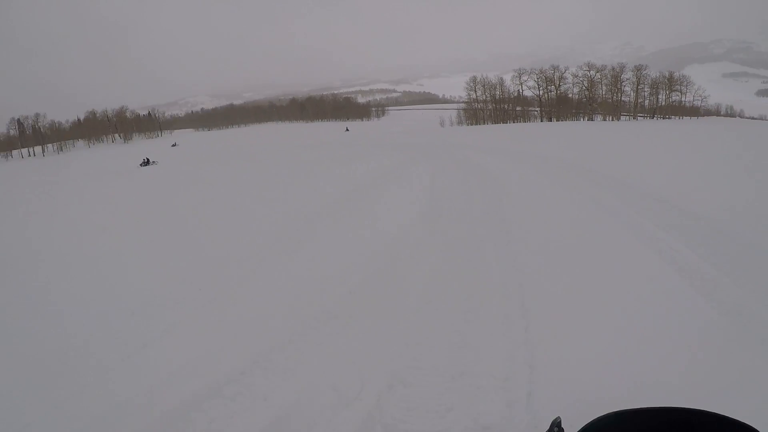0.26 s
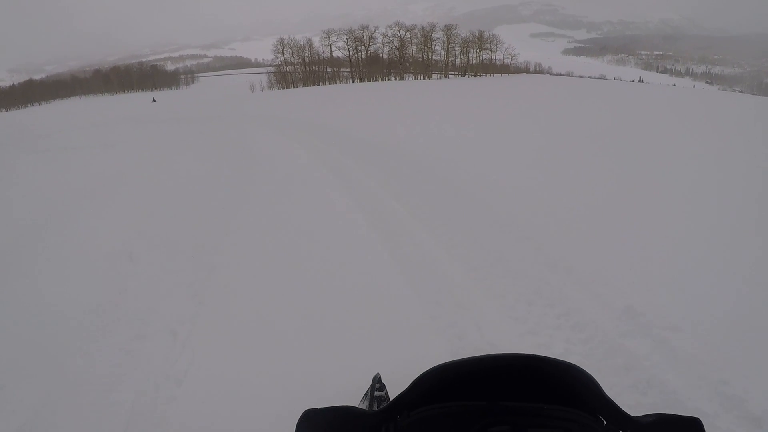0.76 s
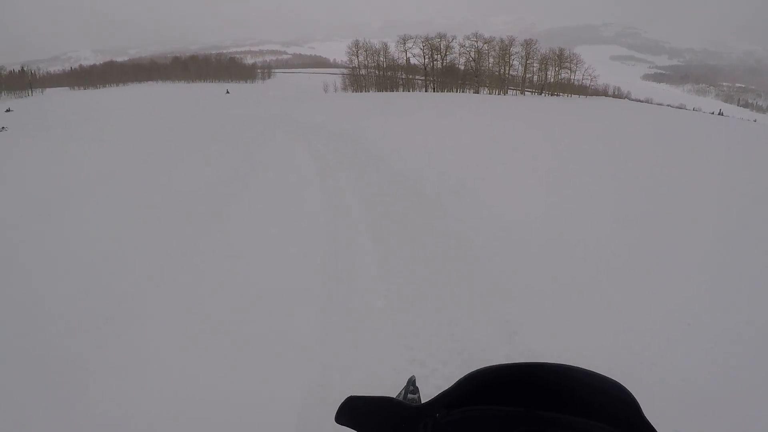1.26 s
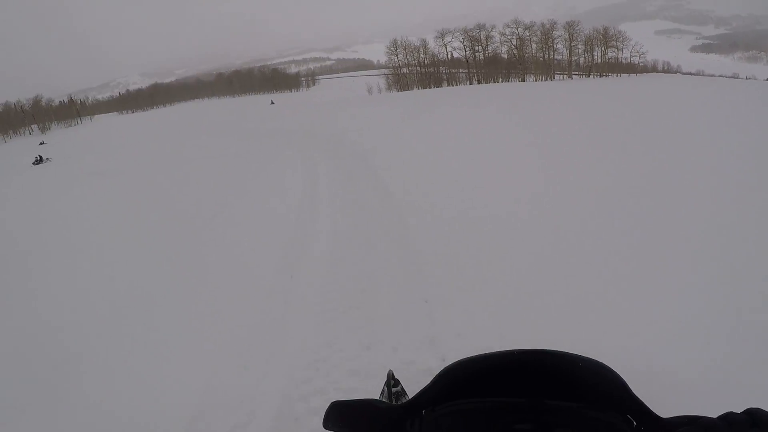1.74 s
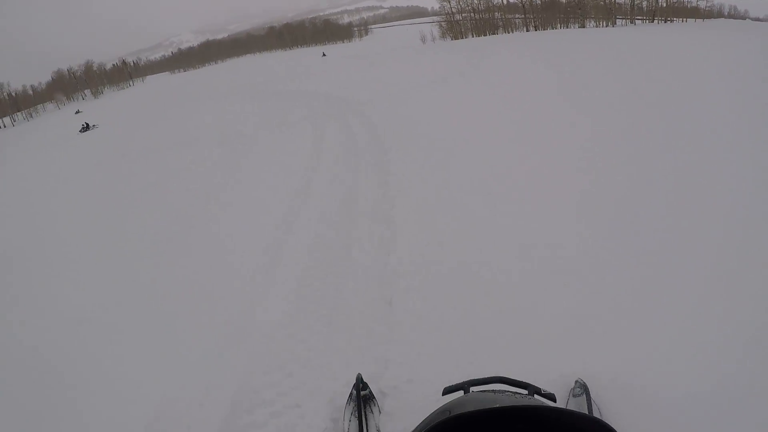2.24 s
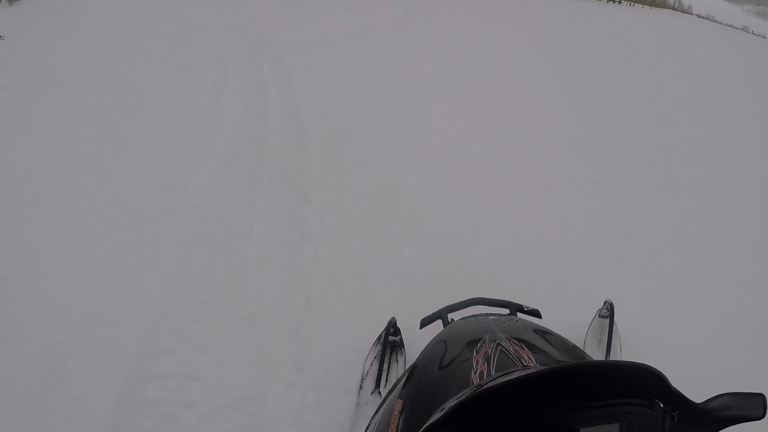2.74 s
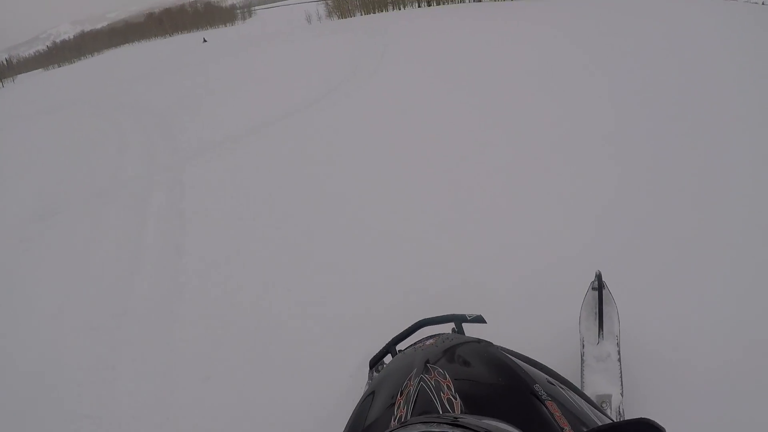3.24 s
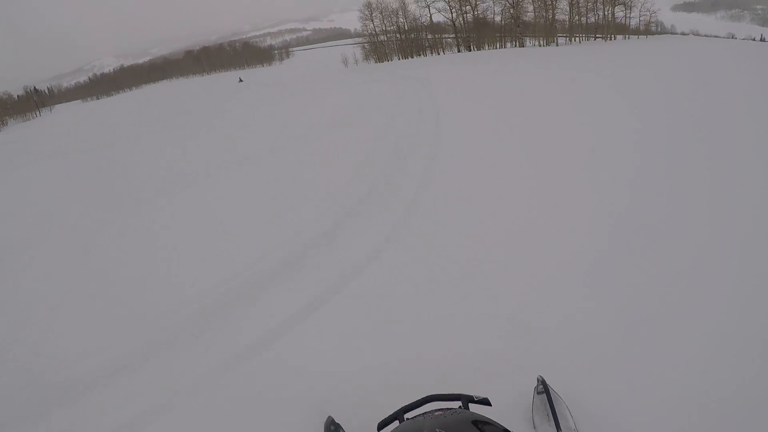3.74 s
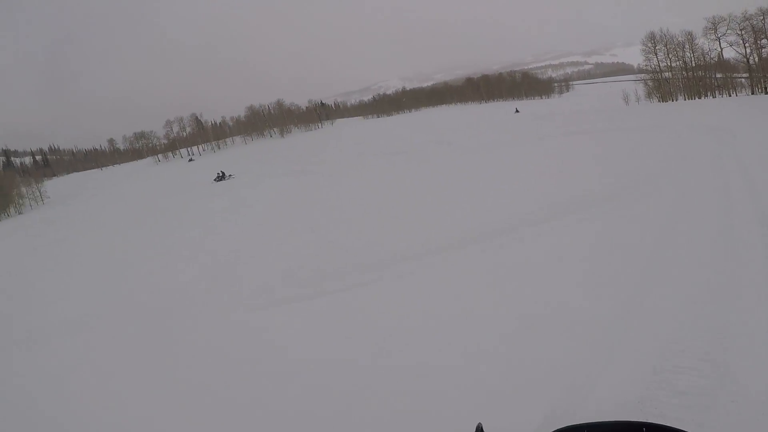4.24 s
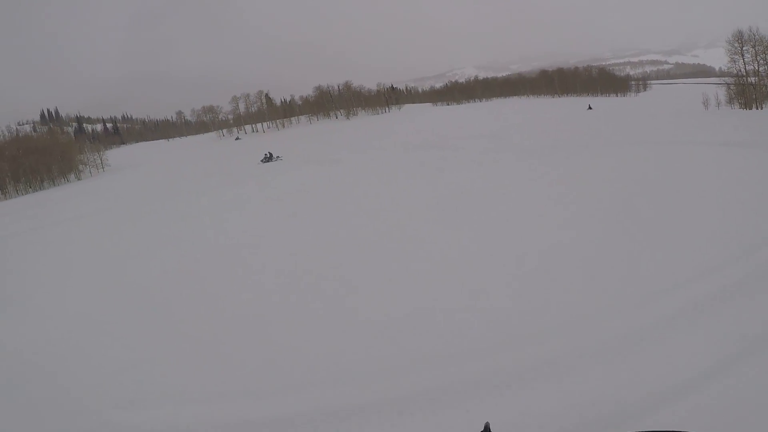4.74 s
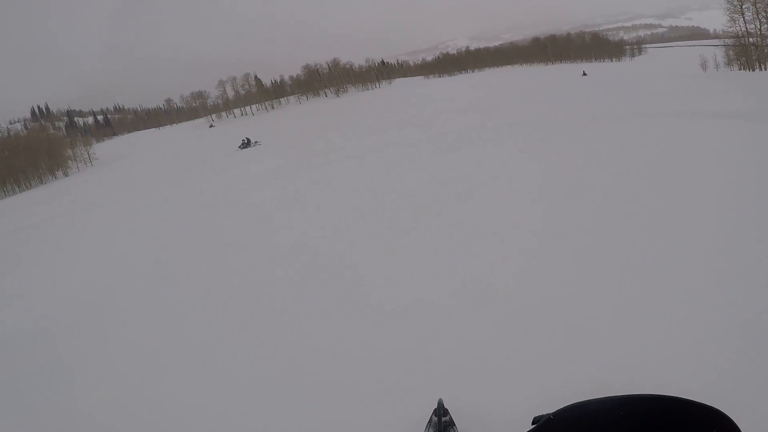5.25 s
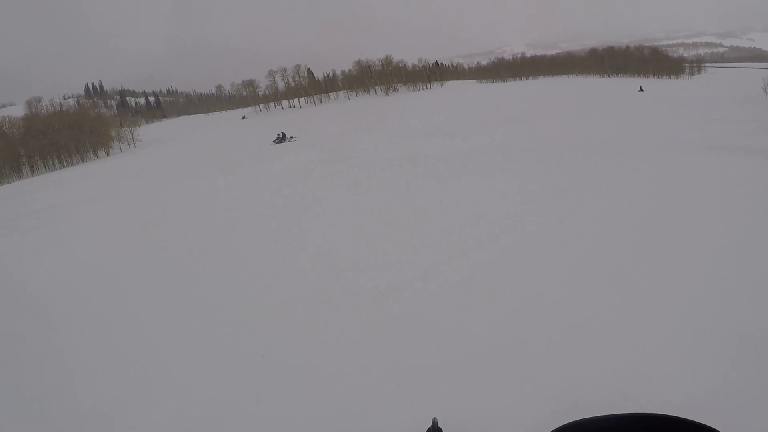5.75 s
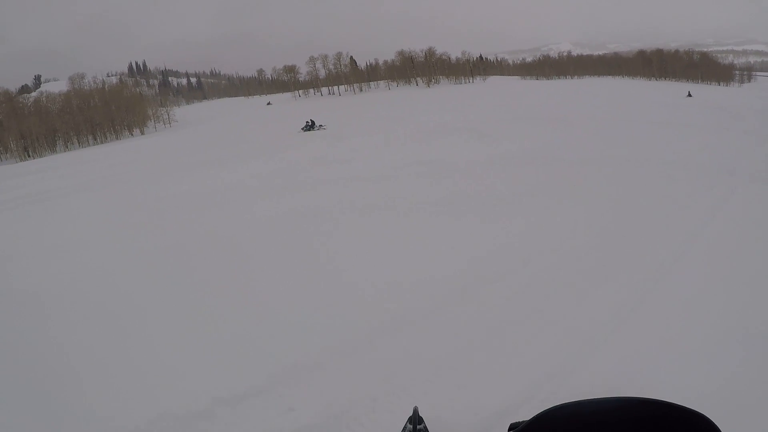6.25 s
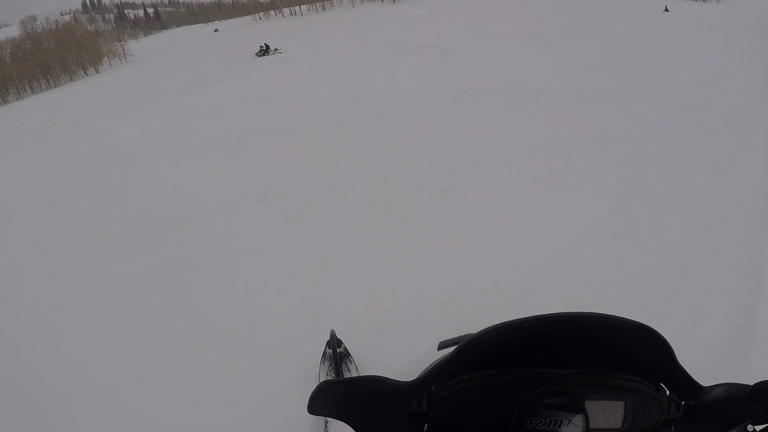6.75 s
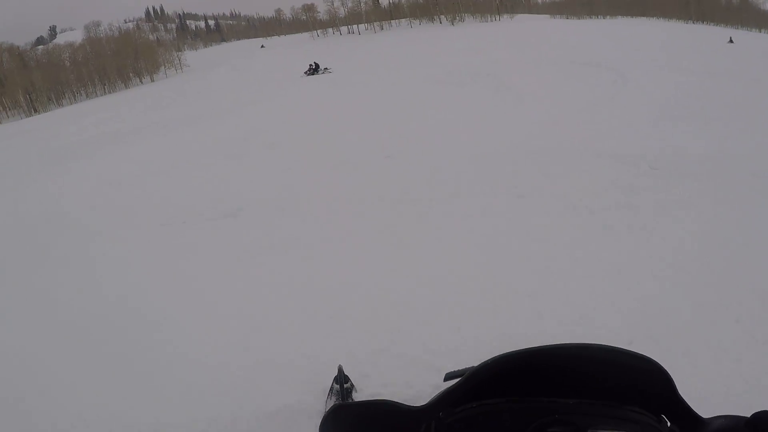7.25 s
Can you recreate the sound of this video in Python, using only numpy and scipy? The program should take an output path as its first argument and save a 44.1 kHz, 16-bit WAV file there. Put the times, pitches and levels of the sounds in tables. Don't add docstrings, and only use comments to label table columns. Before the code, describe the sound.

Outdoors on an open snowfield, helmet microphones sit close to a two-stroke snowmobile. From 0 to 2.2 seconds it cruises with a lumpy, stumbling drone, easing slightly lower, with hood buzz, gassy hiss and low wind rumble in wide stereo. At about 2.3 the throttle opens; the pitch climbs quickly to a hard, raspy, metallic howl by 3.1, while track lugs drum upward from 2.6. The howl holds until about 3.5, then drops steeply as the throttle shuts and the track tone vanishes. A wind gust buffets mainly the left at 3.4 to 3.9. Around 4 the engine coasts, softer and duller, and the image folds toward mono. From 4.5 it gradually regains strength, settling into an uneven, sputtering cruise with stronger wind rumble near 5.3 and faint snow hiss, still running when it stops around 7.5.

```python
import sys
import numpy as np
from scipy import signal
from scipy.fft import rfft, irfft, next_fast_len
from scipy.io import wavfile
from scipy.ndimage import uniform_filter1d

SR = 44100
rng = np.random.default_rng(int(sys.argv[2]) if len(sys.argv) > 2 else 0)


def natural_amplitude(level_db):
    exponent = np.asarray(level_db, float) / 20
    return 10 ** exponent


def waveform_to_disk(signal):
    frames = np.transpose(np.atleast_2d(signal))
    scaled = np.clip(frames, -1, 1) * 32767
    samples = np.round(scaled).astype(np.int16)
    wavfile.write(sys.argv[1], SR, samples)


N = 330750
T = np.arange(N) / SR
HOP = 256

# time_s, side_gain_db
WIDTH = [
    (0, -1),
    (3.75, 0),
    (4, -10.5),
    (4.3, -20.5),
    (4.6, -28),
    (4.8, -33),
    (4.9, -98.5),
    (7.5, -90.5),
]


def engine():
    ride = riding()
    return (exhaust_orders(ride) + stumble(ride) + muffler_rasp(ride) + block_ring(ride)
            + hood_buzz(ride) + gas_hiss(ride))


def riding():
    # time_s, firings_per_s
    firing_rate = [(0, 155), (.2, 154.6), (.5, 144.3), (.85, 136.9), (1.45, 132.7), (2.24, 130.3),
                   (2.33, 140), (2.5, 180.5), (2.94, 253.5), (3.03, 261.1), (3.12, 265.6), (3.52, 259.6),
                   (3.76, 184), (4.01, 156.4), (4.7, 148.8), (5.65, 148), (6.06, 156), (6.6, 153.1)]
    # time_s, intake_effort_db, even_burns_db, uneven_burns_db, firings_per_weak_burn,
    # steadiness_0_to_1
    running = [(0, -37.5, -11.5, -18, 3.07, 0.54), (.3, -35.5, -15.5, -12.5, 3.26, 0.44),
               (.65, -34, -17.5, -14, 4.3, 0.19), (1.2, -36, -17, -13, 4.3, 0.05),
               (1.5, -38, -20.5, -15, 3.4, 1), (2.23, -37.5, -19, -12, 4.04, .8),
               (2.36, -35, -6.5, -24.5, 3, 0.47), (2.7, -28.5, -8.5, -25, 3.7, .3),
               (3.07, -27, -10.5, -27.5, 3.5, 0.28), (3.25, -28, -12.5, -31, 3.8, .5),
               (3.5, -30.5, -14, -23.5, 4.1, 0.6), (3.6, -38, -27.5, -23.5, 2.95, 0.46),
               (3.87, -49, -46, -27.5, 3.2, 0.08), (4.3, -44, -31, -20, 3.5, 0),
               (4.7, -40.5, -22, -14.5, 3.61, 0), (5.5, -38.5, -14.5, -12, 2.68, .2),
               (6.02, -38, -10, -13.5, 3, 0.5), (7.5, -38, -11.5, -15, 3.28, 0.25)]
    open_s, opening_s, shut_s, shutting_s = 2.28, .3, 3.5, 0.0919
    cruise_hz, full_hz = 140, 266
    cruise_db, knee_db = -12.5, -41.5
    loose_hz, locked_hz, wide_open_hz = 25.08, 4.32, 35.14

    hz, = curves(firing_rate)
    effort_db, even_db, uneven_db, spoil, steady = curves(running)
    steady = np.clip(steady, 0, 1)
    opening, shutting = (T - open_s) / opening_s, 1 + (shut_s - T) / shutting_s
    throttle = np.clip(np.minimum(opening, shutting), 0, 1)
    pull = throttle * np.clip((hz - cruise_hz) / (full_hz - cruise_hz), 0, 1)
    folded = np.clip(-curves(WIDTH)[0] / 13, 0, 1)

    turns = np.cumsum(hz) / SR
    clicks = firings(turns)
    burn = np.round(turns).astype(int)
    luck = rng.standard_normal(4000)[burn]
    cylinder = .5 + (-1) ** burn + .06 * luck

    rhythm = beat(hz / spoil, loose_hz + (locked_hz - loose_hz) * steady + wide_open_hz * throttle)
    lumps = 1 + (0.46 + (0.16 - 0.46) * steady) * beat(hz=16, scatter_hz=5.96)
    return dict(
        hz=hz, turns=turns, clicks=clicks, knocks=clicks * cylinder, luck=luck, rhythm=rhythm, lumps=lumps,
        steady=steady, throttle=throttle, pull=pull, revving=pull ** 3.5, folded=folded,
        effort_db=effort_db, over_knee_db=effort_db - knee_db, uneven_db=uneven_db,
        cruise_db=cruise_db, even_over_cruise_db=even_db - cruise_db)


def exhaust_orders(ride):
    # pitch_hz, gain_db
    tailpipe = [(130, 2), (155, -1), (230, -4), (310, 0), (385, -2), (420, -15), (460, -13), (560, -33)]
    order_db, follow = [1.23, -3.5, 0.5, 4.5], [0.97, 0.56, 0.87, 0.82]
    steady_db, folded_db = [1.6, 0.3, 8.8, .1], [0.8, -4, -3.5, -6.5]
    turns, folded = ride["turns"], ride["folded"]
    tone = np.zeros(N)
    for k in range(4):
        level_db = ride["cruise_db"] + follow[k] * ride["even_over_cruise_db"] + order_db[k]
        level_db = level_db + read(tailpipe, (k + 1) * ride["hz"])
        level_db += steady_db[k] * (ride["steady"] - .5) * (1 - folded) + folded_db[k] * folded
        tone += np.sqrt(2) * natural_amplitude(level_db) * np.cos(2 * np.pi * (k + 1) * turns + k)
    tone += natural_amplitude(-32.5 + 17.5 * ride["pull"]) * np.cos(np.pi * turns)
    return tone * (1 + 0.54 * (ride["lumps"] - 1))


def stumble(ride):
    # pitch_hz, width_hz, level_db
    pipe = [(60, 86, -4), (115, 31.5, 4.5), (176.8, 14, -19.5)]
    # pitch_hz, width_hz, level_db
    upper_pipe = [(310.7, 39, -4.5), (359.3, 18, 2.5), (442, 27, -7.5), (488, 140, -15)]
    burns = ride["clicks"] * (ride["rhythm"] + 0.46 * ride["luck"]) * ride["lumps"]
    low = steadied(dull(body(burns, pipe), hz=720))
    upper = steadied(dull(body(burns, upper_pipe), hz=720))
    upper_db = -13 + 10.5 * ride["steady"] - 2.5 * ride["folded"]
    return natural_amplitude(ride["uneven_db"]) * (low + natural_amplitude(upper_db) * upper)


def muffler_rasp(ride):
    # pitch_hz, width_hz, level_db
    shell = [(563, 72, -0.5), (808, 48, 7), (1086, 130, 8.5), (1260, 63, -3), (1584, 44, 3),
             (1799, 90, 8.5), (2120, 650, -7.5), (2640, 90, -4.5), (2880, 71, -5), (3380, 120, -9.5),
             (4020, 120, -6.5), (4630, 310, -10.5), (4900, 400, -11), (6070, 900, -25), (8915, 1300, -25)]
    ring = dull(body(ride["clicks"] * (1 + .06 * ride["luck"]), shell), hz=9000)
    return natural_amplitude(ride["effort_db"] - 4.5 + 11.5 * ride["revving"]) * evened(ring)


def block_ring(ride):
    # pitch_hz, width_hz, level_db
    block = [(280, 120, 11), (627, 160, 3.5), (988, 95, 11.5), (1240, 310, 2), (1550, 220, 0.5),
             (1780, 160, -5), (2050, 160, -1), (2640, 170, -17.5), (3160, 450, -16.5), (4000, 700, -15.5)]
    waver_db, waver_hz = 4, 10
    knots = np.arange(0, N / SR + 1, 1 / waver_hz)
    ring = np.zeros(N)
    for k, mode in enumerate(block):
        waver = natural_amplitude(waver_db * np.interp(T, knots, rng.standard_normal(len(knots))))
        ring += (-1) ** k * waver * body(ride["knocks"], [mode])
    level_db = ride["effort_db"] - 1.5 + 13 * ride["throttle"] - 11 * ride["revving"] - 3 * ride["folded"]
    return natural_amplitude(level_db) * evened(dull(ring, hz=5860))


def hood_buzz(ride):
    # pitch_hz, width_hz, level_db
    panels = [(1093, 40, -2), (1244, 40, -2), (1480, 35, 4), (2417, 25, -9)]
    shaking = rng.standard_normal(N) + 1.3 * evened(ride["knocks"])
    level_db = ride["effort_db"] + 1.05 * np.maximum(ride["over_knee_db"], 0)
    level_db = level_db - 4 - 25 * ride["throttle"] - 0.5 * ride["folded"]
    return natural_amplitude(level_db) * evened(dull(body(shaking, panels), hz=3520))


def gas_hiss(ride):
    # pitch_hz, level_db_per_hz
    hiss_wide = [(290, -7.5), (500, -2.5), (807, -7.5), (1070, -8.5), (1300, -5.5), (1480, -9),
                 (1660, -8.5), (2470, -16), (2860, -20.5), (3400, -18), (4570, -26), (5670, -24),
                 (7630, -33), (9920, -68), (16800, -120)]
    # pitch_hz, level_db_per_hz
    hiss_folded = [(290, -20.5), (500, -5), (620, -6.5), (835, -8), (1300, -5), (1650, -5.5), (2300, -12),
                   (2800, -20.5), (3600, -20.5), (4400, -15.5), (5200, -22.5), (6070, -21.5), (7630, -55),
                   (12000, -69), (16800, -120)]
    # pitch_hz, level_db_per_hz
    sizzle = [(3000, -16.5), (5000, -5.5), (6300, 0), (7600, -9.5), (8300, -11.5), (10000, -23),
              (12500, -30.5), (13200, -65.5), (16800, -84.5)]
    # pitch_hz, level_db_per_hz
    snow = [(6000, -36), (8000, -0.5), (12500, -4.5), (15000, -1), (15400, -62)]
    effort_db, over_db = ride["effort_db"], ride["over_knee_db"]
    sizzle_db = -63 + over_db + 3.2 * np.minimum(over_db, 0)
    sizzle_db += 6 * ride["pull"] - ride["folded"]
    mono = ride["folded"][::HOP]
    power = (1 - mono) * shape(hiss_wide, effort_db + 10.0 - 4 * ride["throttle"])
    power += mono * shape(hiss_folded, effort_db + 8.5)
    power += shape(sizzle, sizzle_db + 14.0)
    power += mono * shape(snow, -70 + 2.8 * ride["even_over_cruise_db"])
    gate = 1 + 0.071 * np.cos(2 * np.pi * ride["turns"]) + 0.046 * ride["rhythm"]
    return gate * noise(power, patchy_db=1.24)


def track():
    # time_s, lug_hits_per_s
    lugs = [
        (2.6, 80),
        (2.74, 103),
        (2.82, 127),
        (3.1, 180),
        (3.31, 195.5),
        (3.56, 212),
    ]
    hz, = curves(lugs)
    turns = np.cumsum(hz) / SR
    on = np.interp(T, [2.6, 2.75, 3.53, 3.6], [0, 1, 1, 0])
    shake = 1 + 0.18 * evened(dull(rng.standard_normal(N), hz=24.9))
    drum = natural_amplitude(-20) * np.cos(2 * np.pi * turns)
    half_rate = natural_amplitude(-29) * np.cos(np.pi * turns)
    return on * shake * np.sqrt(2) * (drum + half_rate)


def wind_rumble():
    # pitch_hz, level_db_per_hz
    rumble = [(15, -26.5), (30, -14), (50, -10.5), (70, -11), (120, -1.5), (200, -8.5), (400, -27.5),
              (900, -52.5), (4000, -100)]
    # time_s, level_db
    airspeed = [
        (0, -26),
        (.9, -29.5),
        (2.3, -26),
        (2.75, -36),
        (3.1, -25.5),
        (3.7, -32),
        (4.1, -39),
        (5.3, -23),
        (7.5, -28.5),
    ]
    return noise(shape(rumble, curves(airspeed)[0] + 9), patchy_db=1.0)


def wind_gust():
    # time_s, level_db
    strike = [
        (3.36, -67),
        (3.42, -17),
        (3.55, -12.5),
        (3.7, -20),
        (3.85, -25.5),
        (4.1, -55),
    ]
    gust = evened(dull(body(rng.standard_normal(N), [(304, 140, 0)]), hz=1200))
    return natural_amplitude(curves(strike)[0]) * gust * np.array([[1], [-.3]])


def ports(x):
    # pitch_hz, left_minus_right_db
    lean = [(60, 4.5), (120, -0.5), (240, -0.5), (470, -6), (920, -9.5), (1830, -9), (3620, -7), (7180, -1)]
    # pitch_hz, left_lead_radians
    lead = [(0, 0), (300, 0.95), (600, -1.17), (1210, -3), (1460, -4.5), (3700, -5.5), (5100, -7),
            (7300, -9.5), (16000, -14.5)]
    edge = SR // 10
    size = next_fast_len(N + 2 * edge)
    hz = np.fft.rfftfreq(size, 1 / SR)
    half = natural_amplitude(read(lean, hz) / 2) * np.exp(.5j * np.interp(hz, *np.transpose(lead)))
    padded = np.pad(x, ((0, 0), (edge, edge)), "reflect")
    return irfft(rfft(padded, size) * np.array([half, 1 / half]), size)[:, edge:edge + N]


def firings(turns):
    at = np.flatnonzero(np.diff(np.floor(turns)))
    late = (np.floor(turns[at + 1]) - turns[at]) / (turns[at + 1] - turns[at])
    clicks = np.zeros(N)
    clicks[at], clicks[at + 1] = 1 - late, late
    return clicks


def beat(hz, scatter_hz):
    wander = evened(signal.lfilter([1], [1, -np.exp(-2 * np.pi * 12 / SR)], rng.standard_normal(N)))
    return np.cos(2 * np.pi * np.cumsum(hz + scatter_hz * wander) / SR)


def body(x, modes):
    out = np.zeros(N)
    for k, (hz, width, db) in enumerate(modes):
        r = np.exp(-np.pi * width / SR)
        poles = [1, -2 * r * np.cos(2 * np.pi * hz / SR), r * r]
        out += (-1) ** k * natural_amplitude(db) * signal.lfilter([1 - r, 0, r - 1], poles, x)
    return out


def noise(power, patchy_db):
    # pitch_hz, likeness_0_to_1
    likeness = [(50, .93), (250, .85), (700, .55), (1500, .75), (3500, .65), (7000, .4)]
    power = np.pad(power, ((0, 0), (0, HOP // 64)), "edge")
    a, b, c, d, patches = rng.standard_normal((*power.T.shape, 5)).T
    patches = uniform_filter1d(uniform_filter1d(patches, size=10, axis=0), size=10, axis=1)
    same = np.clip(read(likeness, np.fft.rfftfreq(4 * HOP, 1 / SR)), 0, 1)[:, None]
    left = a + 1j * b
    right = same * left + np.sqrt(1 - same ** 2) * (c + 1j * d)
    z = np.array([left, right]) * np.sqrt(power) * natural_amplitude(patchy_db * evened(patches))
    return signal.istft(z, nperseg=4 * HOP, noverlap=3 * HOP)[1][:, :N]


def shape(points, level_db):
    power = natural_amplitude(2 * read(points, np.fft.rfftfreq(4 * HOP, 1 / SR)))
    return np.outer(power / power.sum(), natural_amplitude(2 * level_db[::HOP]))


def dull(x, hz):
    return signal.sosfilt(signal.butter(4, hz, fs=SR, output="sos"), x)


def evened(x):
    return x / np.sqrt(np.mean(x ** 2) + 1e-20)


def steadied(x, size=8000):
    return x / np.sqrt(uniform_filter1d(uniform_filter1d(x ** 2, size), size) + 1e-20)


def curves(rows):
    s, *columns = np.transpose(rows)
    return [np.interp(T, s, c) for c in columns]


def read(points, hz):
    f, value = np.transpose(points)
    return np.interp(np.log(hz + 1), np.log(f + 1), value)


def scene():
    return ports(engine() + track() + wind_rumble()) + wind_gust()


def treble_dropouts(x):
    # pitch_hz, share_of_patches_dropped
    lost = [(6500, 0), (7800, .12), (8300, .4), (11500, .45), (12700, .7), (13000, 1)]
    hz, t, z = signal.stft(x, SR, nperseg=4 * HOP)
    luck = rng.random((len(hz) // 5 + 1, len(t) // 5 + 1))
    luck = luck.repeat(5, axis=0).repeat(5, axis=1)[:len(hz), :len(t)]
    apart = np.interp(t, *np.transpose(WIDTH)) > -6
    dropped = (luck < read(lost, hz)[:, None]) & apart
    return signal.istft(z * ~dropped, SR, nperseg=4 * HOP)[1][:, :N]


def band_limit(x):
    return signal.sosfilt(signal.butter(12, 15600, fs=SR, output="sos"), x)


def record(dry):
    mid = dry.mean(0)
    side = (dry[0] - dry[1]) / 2 * natural_amplitude(curves(WIDTH)[0])
    pair = np.array([mid + side, mid - side]) * np.clip((T[-1] - T) / .004, 0, 1)
    limited = 1.09 * np.tanh(pair / 1.233)
    return band_limit(treble_dropouts(limited))


dry = scene()
out = record(dry)
waveform_to_disk(out)
```